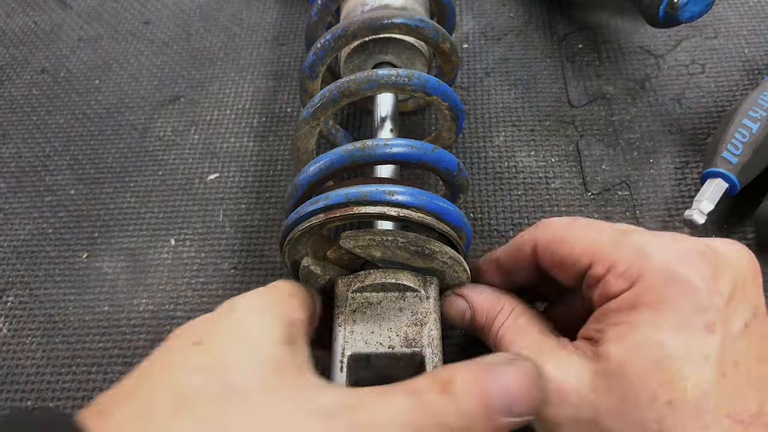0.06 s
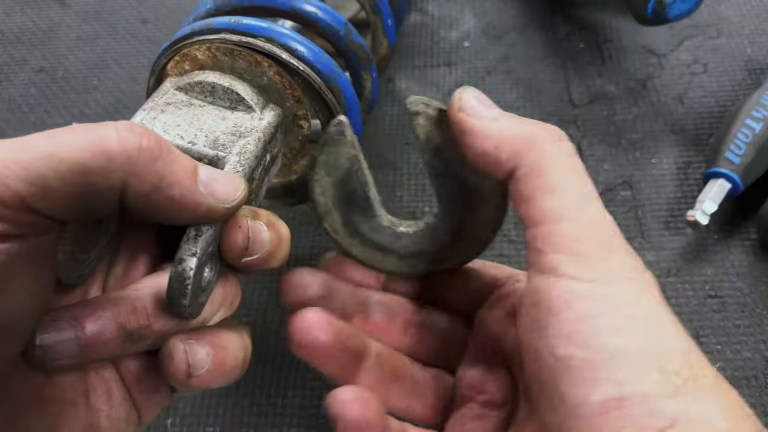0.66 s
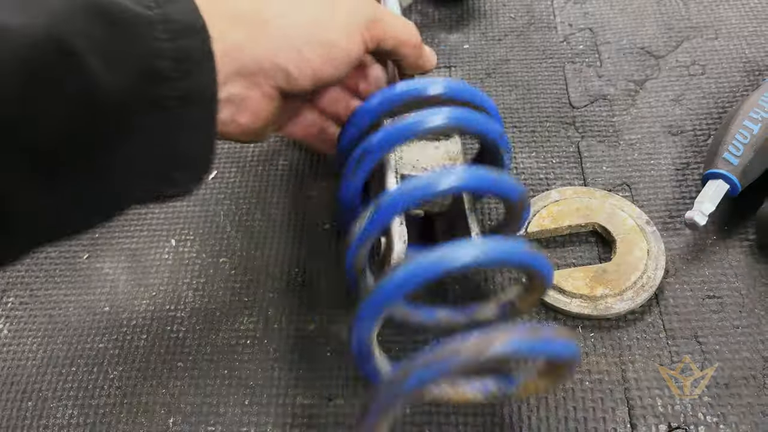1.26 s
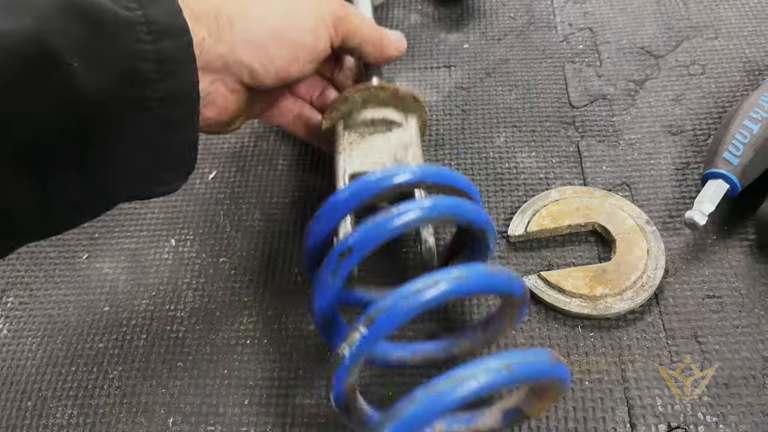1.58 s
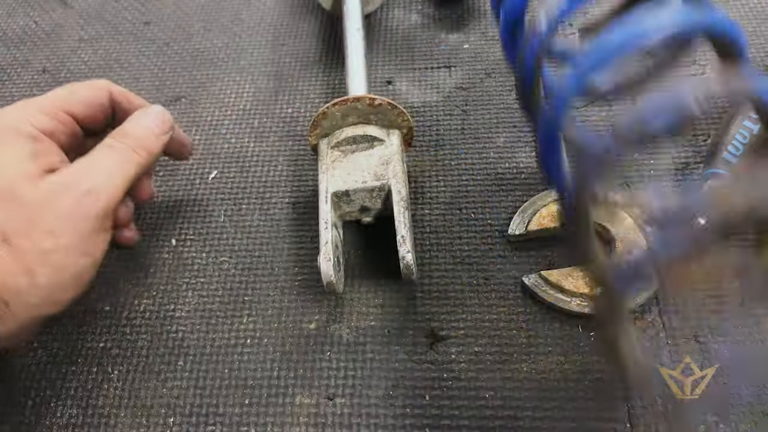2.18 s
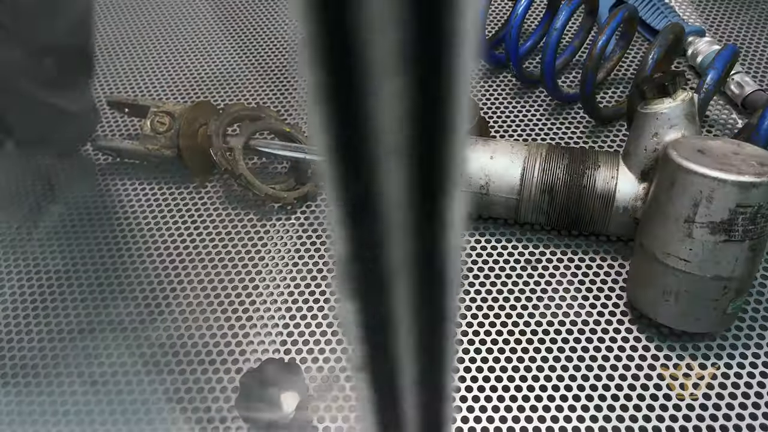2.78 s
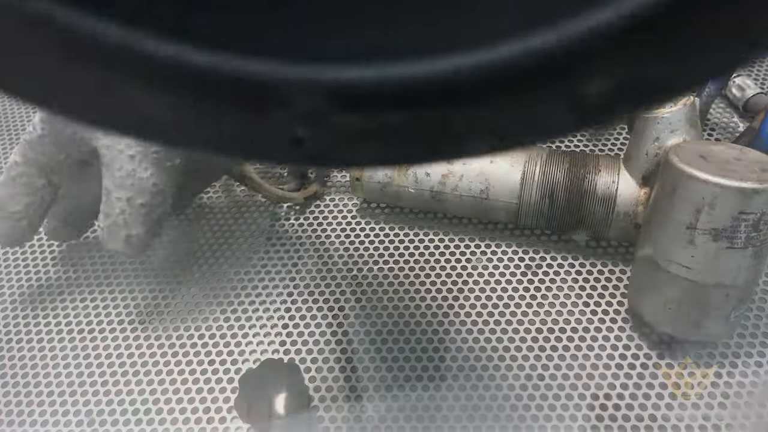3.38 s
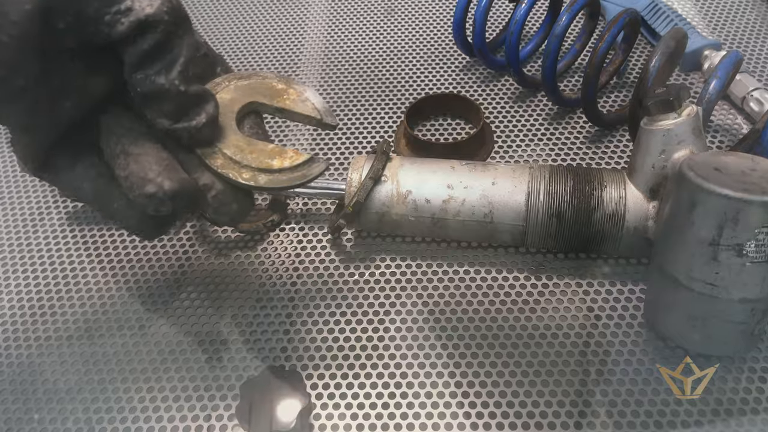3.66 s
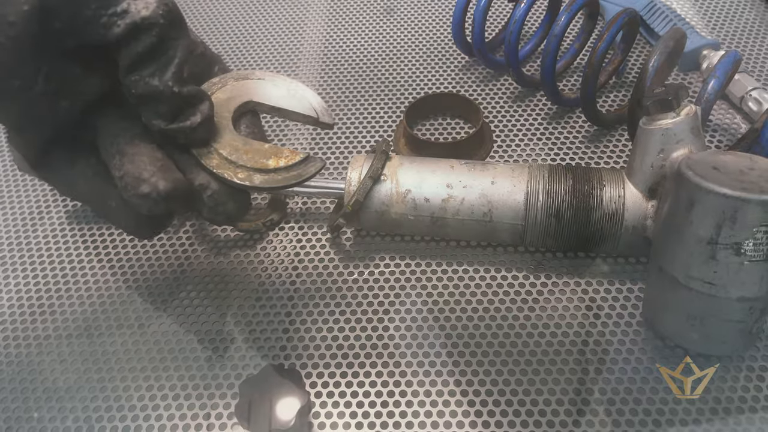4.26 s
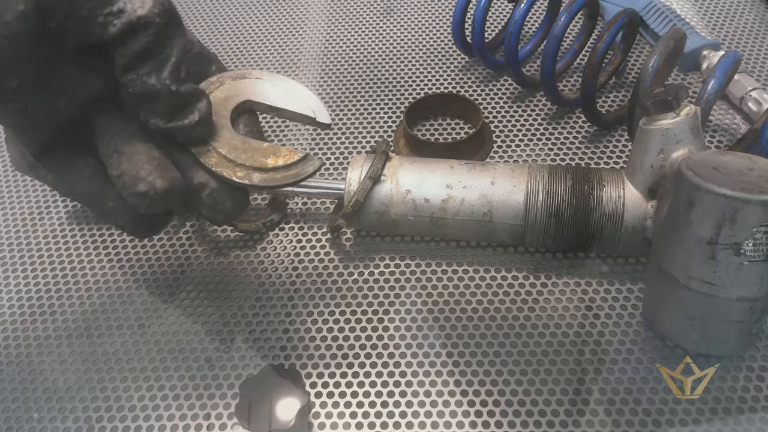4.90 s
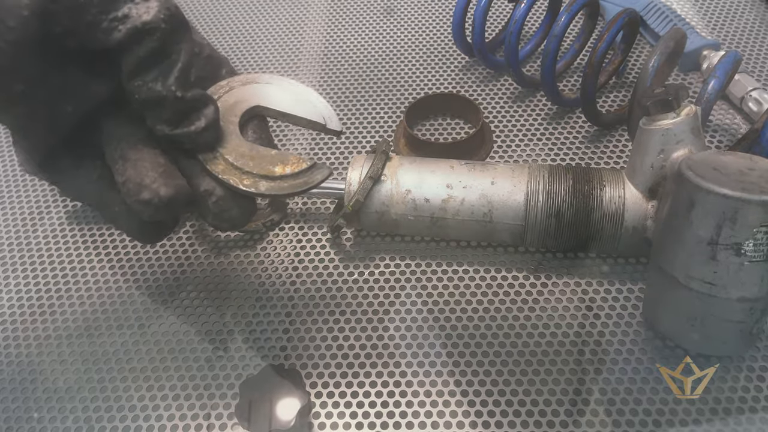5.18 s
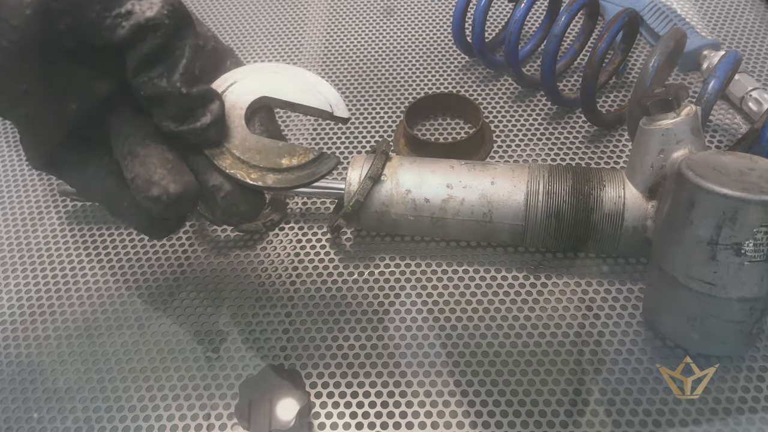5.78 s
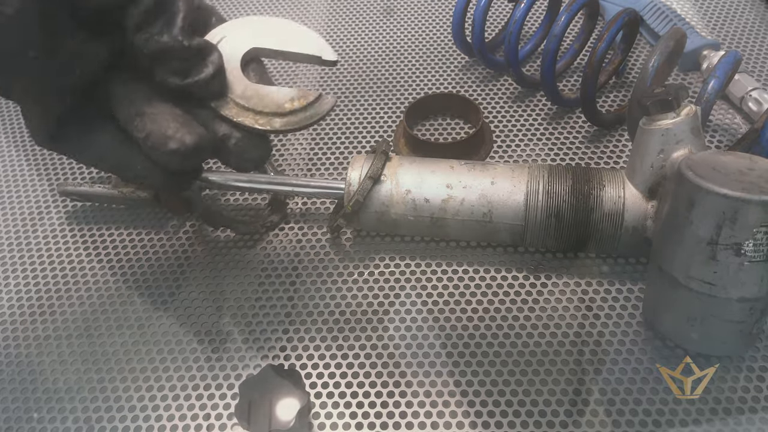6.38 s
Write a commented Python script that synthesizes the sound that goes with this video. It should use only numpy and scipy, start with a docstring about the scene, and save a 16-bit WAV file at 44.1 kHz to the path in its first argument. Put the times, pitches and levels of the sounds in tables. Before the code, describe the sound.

Heard up close in a quiet workshop, small metal clicks and soft hand rubs give way to the scraping and sharp clanking of a steel spring being pulled off a shock absorber. After a brief lull, a blast gun suddenly rushes with air and sputters. Then grit flows in a loud, steady, slightly boxy hiss against a steel collar inside the cabinet, lasting to the end.

```python
"""A jet of grit hisses on a hand-held steel collar in a blast cabinet. Turbulent air roars alone at first,
clumps of grit spit, then countless impacts merge into a bright hiss, coloured by the box's standing waves.
Before this, at the bench, the slotted collar is worked off a shock absorber and the coil spring slides
off, clanking on the fork: friction makes the scraping, and impacts excite the modes of the steel.
The change from bench to cabinet is abrupt. One close microphone with a limiter picks up both."""
import sys
import numpy as np
from scipy import signal
from scipy.fft import rfft, irfft, next_fast_len
from scipy.io import wavfile

SR = 44100
rng = np.random.default_rng(int(sys.argv[2]) if len(sys.argv) > 2 else 0)


def master(y):
    """Save y as 16-bit WAV."""
    cut = np.clip(np.atleast_2d(y).T, -1, 1)
    pcm = np.round(cut * 32767)  # scale
    wavfile.write(sys.argv[1], SR, pcm.astype(np.int16))


N = 292907
TIME, HZ = np.arange(N) / SR, np.fft.rfftfreq(N, 1 / SR)

# Noise spectra. Each row: frequency in Hz, relative spectral density in dB.
ROOM_SPECTRUM = [(20, -23.5), (35, -14), (52, -0.5), (85, -9), (130, -8), (250, -11), (400, -17.5),
                 (700, -24), (1200, -26), (3000, -41.5), (9000, -41.5), (16000, -51)]
SCRAPE_SPECTRUM = [(240, -52), (400, -12.5), (1130, -9.5), (1630, 0), (2750, -14), (3120, -8.5),
                   (5430, -7.5), (6850, -11.5), (8630, -6), (11000, -15.5), (16000, -17.5)]
CRACK_SPECTRUM = [(88, -54), (150, -29), (566, -27), (1360, -7.5), (2360, -10.5), (3420, -3), (4080, -4),
                  (4410, -7.5), (5570, -9.5), (7180, -16), (8230, -10), (9630, -11.5), (16000, -39)]
ROAR_SPECTRUM = [(300, -25), (600, -3.5), (850, -4), (1150, 0), (1550, 1.5), (2100, -1), (2700, -4.5),
                 (3300, -9.5), (4500, -13), (6000, -16), (12000, -36)]
BUFFET_SPECTRUM = [(20, -29), (45, -15), (70, -1.5), (130, -7), (290, 1), (500, -4), (800, -14),
                   (1500, -22.5)]
NOZZLE_SPECTRUM = [(1500, -12), (3200, 4), (4800, 6), (6000, -1), (7500, 2), (10300, 3), (11200, -1),
                   (13000, 0), (13300, 3.5), (16000, 1)]
GRIT_SPECTRUM = [(24, -56), (40, -27), (115, -20.5), (147, -22), (372, -10.5), (503, -12.5), (542, -11.5),
                 (646, -14), (1090, -9), (1340, -8), (3220, -3), (5720, -3), (10200, -4), (11300, -11),
                 (16000, -17.5)]
GLOVE_SPECTRUM = [(20, -4), (45, -4), (110, 4), (160, -22), (1000, -70)]
SKIN_SPECTRUM = [(200, -12), (1600, -1), (3000, -7.5), (5000, -7), (10000, -8.0), (16000, -18)]
SPIT_SPECTRUM = [(400, -16), (1500, 5), (4000, 3), (8000, -1), (16000, -7)]
# Sliding movements. Each row: start in seconds, end in seconds, level in dB.
FINGER_RUBS = [(-0.06, 0.085, -46.5), (0.08, 0.17, -54), (0.14, 0.25, -51.5), (1.74, 2.08, -58),
               (2.03, 2.17, -55), (2.14, 2.5, -54.5)]
STEEL_SCRAPES = [(0.915, 1.05, -40.5), (1.04, 1.13, -31), (1.10, 1.21, -44), (1.18, 1.30, -32),
                 (1.275, 1.405, -27.5), (1.39, 1.72, -45), (1.722, 1.82, -36)]
COLLAR_DRAGS = [(0.24, 0.35, -50), (0.32, 0.425, -46)]
GLOVE_SHIFTS = [(3.45, 4.15, -50), (4.35, 5.1, -47.5)]
# Dry taps of the hands. Each row: start in seconds, level in dB, treble tilt in dB per octave.
HAND_TAPS = [(0.0812, -41, -1), (0.483, -33, -8), (2.058, -48, -5), (2.128, -47, 0), (2.1313, -41, 0)]
# The strut bumps on a rubber mat. Each row: start in seconds, level in dB, frequency in Hz.
MAT_BUMPS = [(0.0, -42, 110), (0.66, -44, 124), (0.941, -38.5, 70), (1.195, -29.5, 66.6), (1.58, -44, 130)]
# Modes of the collar, and of spring and fork. Each row: frequency in Hz, level in dB, t60 in seconds.
COLLAR_MODES = [(1877, 3.5, 0.054), (2490, -5, .14), (3800, -9, 0.023), (4300, 1, .08), (5360, -4, 0.086),
                (6700, -10.5, 0.25), (7550, -14, .06), (9700, -3, .06), (10000, -7.5, 0.037),
                (10870, -12, .06), (11820, -7, 0.14), (13620, -7, .06)]
SPRING_MODES = [(1306, -11, 0.24), (1650, -6, .2), (1965, -13, 0.32), (2120, -3, 0.13), (2630, -19.5, 1.3),
                (2670, -6.5, 0.29), (3040, -16, 0.81), (3120, 0, 0.15), (3300, -6.5, .18),
                (3490, -1.5, 0.19), (3570, -17, 0.43), (3800, -13, 0.13), (3940, -19, .3),
                (4030, 0.5, 0.14), (4100, -12.5, 0.41), (4350, -14, 0.42), (4700, -6, 0.18),
                (5030, -3.5, 0.11), (5310, -3.5, 0.22), (5770, 0.5, .16), (6056, -17, 0.19),
                (6500, -15, .13), (6900, -11, 0.17), (7700, -6, 0.16), (8500, -20, 0.15), (9318, -5, 0.11),
                (9850, -12, 0.1), (10200, -7, 0.11), (11850, -21.5, .1)]
# The collar ticks on its seat. Each row: start in seconds, level in dB, factor on t60,
# frequency in Hz that the contact point favours.
COLLAR_TICKS = [(0.2635, -40, .3, 4300), (0.355, -42, .4, 4300), (0.412, -38, 1.7, 11800),
                (0.420, -37, 0.46, 3800), (0.425, -33, 0.65, 4300), (0.434, -34.5, 0.41, 5300),
                (0.473, -46, .5, 11800), (0.489, -39, 0.7, 5300), (0.9176, -32, 1, 11800)]
# The spring knocks on the fork. Each row: start in seconds, level in dB, treble tilt in dB per octave,
# relative level of the ring in dB, frequency in Hz that the contact point favours, factor on t60.
SPRING_CLANKS = [(0.9172, -29, -8, 0, 11700, 0.94), (0.9418, -9, 3.5, -6.5, 4340, 0.49),
                 (1.1548, -22, -0.5, -10.5, 5000, 0.59), (1.1938, -29, -7, 1.5, 1510, 0.27),
                 (1.2266, -11.5, -1.5, 0, 3740, 0.77), (1.2533, -14.5, -0.5, 2.5, 3730, 0.79),
                 (1.3334, -21, -2, -5, 3200, 0.63), (1.3586, -22.5, 1, 6, 3170, 0.64),
                 (1.386, -11, 2.5, 1, 9700, 0.34), (1.389, -16.5, 0, -5, 3300, 0.98),
                 (1.5797, -10.5, -2.5, -6, 3630, 0.8), (1.6105, -14.5, 0, -3.5, 5700, 0.47),
                 (1.656, -30.5, -2, -14, 1300, .5)]
# Peaks and dips of the steel box. Each row: frequency in Hz, width in Hz, gain in dB for air, for grit.
CABINET_BANDS = [(132, 27, 0.5, 4), (182, 18, 4.5, 3), (215, 23, -7, 1.5), (266, 14, 0, 5),
                 (295, 19, -2, -7.5), (328, 31, 1.5, 3.5), (355, 16, -0.5, -7), (386, 20, -3.5, 5),
                 (405, 17, 0, -8), (505, 22, 1.5, -4), (537.3, 16, 5, 7), (571, 13, 4.5, -9),
                 (602, 10, 1, 7.5), (650, 30, 2.5, 1), (714, 12, 4, 8), (754, 18, 5, 3), (799, 16, 2, 8),
                 (823, 19, -7, -11), (856, 15, 6.5, 3.5), (1025, 17, -1, 5), (1117, 53, 3.5, 3.5),
                 (1185, 20, -7, -2.5), (1327, 71, -2.5, -7.5), (1346, 33, 3, 2.5), (1530, 19, 2, 2),
                 (2270, 550, -1, -1.5), (2950, 830, 0.5, 2.5), (5950, 1060, -1, -3.5), (10800, 410, 3, 1),
                 (11270, 1500, -1.5, -3)]
# The air surges. Each row: start in seconds, end in seconds, relative swell, sizzle level in dB.
AIR_SURGES = [(2.47, 2.6, 1, -38), (2.58, 2.68, 4, -24), (2.73, 2.91, 2.2, -36)]
# The first clumps of grit leave the nozzle. Each row: start in seconds, level in dB.
GRIT_SPITS = [(2.600, -15), (3.088, -18), (3.1163, -12.5), (3.1463, -12.5), (3.171, -10), (3.3239, -17),
              (3.5576, -9)]
# The uneven feed of grit, heard as the level of the treble. Each row: time in seconds, level in dB.
GRIT_FEED = [(3.58, -15), (3.68, -16.5), (3.87, -23.5), (4.53, -17.5), (4.85, -17.5), (4.99, -23),
             (5.89, -19.5), (6.1, -20), (6.34, -17.5), (6.55, -18), (6.62, -17)]
# The jet hits the collar squarely. Each row: start in seconds, end in seconds, midrange gain in dB.
JET_SWEEPS = [(3.72, 3.84, 1.5), (4.617, 4.88, 2), (5.097, 6.352, 2), (5.836, 5.95, 2), (6.24, 6.492, 4.6)]

SPRING_FREE_S, AIR_ON_S, GRIT_ON_S = 1.72, 2.435, 3.555


def gain_of(db):
    """Amplitude grows tenfold for every 20 dB."""
    return 10 ** (np.asarray(db) / 20)


def unit_rms(x):
    """Division by the rms gives a signal unit power."""
    return x / np.sqrt(np.mean(x ** 2) + 1e-20)


def spectrum_db(points, hz=HZ):
    """Interpolation on a log-frequency axis joins points into a spectrum."""
    f, db = np.transpose(points)
    return np.interp(np.log(hz + 1), np.log(f + 1), db)


def add(mix, s, sound):
    """Superposition: a sound joins the mix at s seconds."""
    start = round(s * SR)
    sound = sound[max(-start, 0):]
    part = mix[max(start, 0):][:len(sound)]
    part += sound[:len(part)]


def coloured(x, db):
    """Linear filtering multiplies each frequency by its own gain."""
    size = next_fast_len(N)
    response = gain_of(np.interp(np.fft.rfftfreq(size, 1 / SR), HZ, db))
    return irfft(rfft(x, size) * response, size)[:N]


def below(x, edge_hz, order):
    """A zero-phase low-pass filter keeps what lies under the edge."""
    return coloured(x, -20 * np.log10(1 + (HZ / edge_hz) ** order))


def noise(db):
    """Filtered white noise takes on the filter's spectrum; its rms is 1."""
    return unit_rms(coloured(rng.standard_normal(N), db))


def flutter(rate_hz):
    """Slow noise of rms 1, from about 8 Hz to rate_hz, serves as a random modulator."""
    return noise(-10 * np.log10(1 + (HZ / rate_hz) ** 4) - 10 * np.log10(1 + (8 / (HZ + .01)) ** 4))


def ramp(start_s, rise_s):
    """A linear envelope rises from 0 to 1 and holds."""
    return np.clip((TIME - start_s) / rise_s, 0, 1)


def arch(start, end):
    """A half-sine envelope rises from 0 to 1 and falls back."""
    return np.sin(np.pi * np.clip((TIME - start) / (end - start), 0, 1))


def strokes(rows):
    """Overlapping swells sum to one amplitude envelope."""
    return sum(gain_of(db) * arch(start, end) for start, end, db in rows)


def crack(tilt_db, t60, tail_db, tail_t60):
    """Dense, heavily damped modes merge into a noise burst; bench and walls reflect a weak tail."""
    t, hz = np.arange(16384) / SR, np.fft.rfftfreq(16384, 1 / SR)
    colour_db = spectrum_db(CRACK_SPECTRUM, hz) + tilt_db * np.log2(np.maximum(hz, 700) / 4000)
    burst = unit_rms(irfft(rfft(rng.standard_normal(len(t))) * gain_of(colour_db)))
    return burst * np.hypot(gain_of(-60 * t / t60), gain_of(tail_db - 60 * t / tail_t60))


def ring(modes, favoured_hz, t60_factor, favour_db, scatter_db):
    """Free vibration: the contact point decides which modes take the blow, and the grip damps them."""
    hz, db, t60 = np.transpose(modes)[:, :, None]
    t = np.arange(SR * 2 // 3) / SR
    nearness = np.exp(-(np.log2(hz / favoured_hz) / 0.34) ** 2)
    amplitude = gain_of(db + favour_db * nearness + scatter_db * rng.standard_normal(hz.shape))
    waves = np.sin(2 * np.pi * (hz * t + rng.random(hz.shape)))
    decay = gain_of(-60 * t / (t60 * t60_factor))
    return (amplitude * waves * decay).sum(0) / np.sqrt(np.sum(amplitude ** 2) / 2)


def workshop():
    """Ambient noise: a low rumble and a faint hiss waver slightly in level."""
    return noise(spectrum_db(ROOM_SPECTRUM)) * gain_of(-47 + flutter(8))


def gloves():
    """Friction of the rubber gloves in their ports makes a faint rumble."""
    return noise(spectrum_db(GLOVE_SPECTRUM)) * strokes(GLOVE_SHIFTS)


def handling():
    """Friction of coil and fingers gives grainy noise; light impacts give taps and damped thuds."""
    catches = rng.random(N) < 350 / SR  # rust and dirt snag the coil
    force = catches * gain_of(4 * np.minimum(rng.exponential(1, N), 3.5))
    grains = signal.oaconvolve(force, crack(1.5, t60=.006, tail_db=-29, tail_t60=.04))[:N]
    sliding = noise(spectrum_db(SCRAPE_SPECTRUM)) * gain_of(2 * flutter(260))
    scrape = unit_rms(sliding + gain_of(-8) * unit_rms(grains))
    skin = noise(spectrum_db(SKIN_SPECTRUM)) * gain_of(2.2 * flutter(180))
    out = scrape * strokes(STEEL_SCRAPES) + skin * strokes(FINGER_RUBS)
    for s, db, tilt_db in HAND_TAPS:
        add(out, s, gain_of(db) * crack(tilt_db, t60=.016, tail_db=-15, tail_t60=0.15))
    t = np.arange(SR // 2) / SR
    bump_envelope = t / 0.035 * np.exp(1 - t / 0.029)
    for s, db, hz in MAT_BUMPS:
        add(out, s, gain_of(db) * bump_envelope * np.sin(2 * np.pi * hz * t))
    return out


def collar():
    """Stick-slip friction in the slot makes the collar catch and sing; small impacts make it tick."""
    snags_per_s, snag_db = 45, 5
    click = dict(tilt_db=1, t60=0.013, tail_db=-26, tail_t60=.08)
    out, drag = np.zeros(N), strokes(COLLAR_DRAGS)
    for s, db, t60_factor, hz in COLLAR_TICKS:
        add(out, s, gain_of(db) * ring(COLLAR_MODES, hz, t60_factor, favour_db=3, scatter_db=2.0))
        add(out, s, gain_of(db - 5) * crack(**click))
    snags = drag * (rng.random(N) < snags_per_s / SR)
    out += gain_of(snag_db) * signal.oaconvolve(snags, crack(**click))[:N]
    mode_power = sum(gain_of(db) ** 2 / (1 + ((HZ - hz) / 70) ** 2) for hz, db, _ in COLLAR_MODES)
    squeak_db = 7 * np.exp(-((HZ - 10000) / 700) ** 2)  # sliding feeds the high modes most
    singing = noise(10 * np.log10(mode_power) + squeak_db) * gain_of(2.1 * flutter(200))
    return out + singing * drag


def spring():
    """Impact excitation: each knock cracks and rings, and the coil rebounds once, softer and duller."""
    rebound_s = 0.0245
    out = np.zeros(N)
    for s, db, tilt_db, ring_db, hz, t60_factor in SPRING_CLANKS:
        blow = crack(tilt_db, t60=0.042, tail_db=-22, tail_t60=0.31)
        ringing = ring(SPRING_MODES, hz, t60_factor, favour_db=12, scatter_db=1.8)
        rebound = crack(tilt_db - 4.5, t60=0.033, tail_db=-18, tail_t60=0.28)
        add(out, s, gain_of(db + 2) * blow)
        add(out, s, gain_of(db + ring_db) * ringing)
        add(out, s + rebound_s, gain_of(db - 14) * rebound)
    return out * gain_of(-30 * ramp(SPRING_FREE_S, 0.23))  # the hand mutes the freed spring


def cabinet():
    """Standing waves, distinct in the bass and dense above, set the box's gain in dB for air and grit."""
    air_db, grit_db = np.zeros((2, len(HZ)))
    for hz, width, air_peak_db, grit_peak_db in CABINET_BANDS:
        band = 1 / (1 + (2 * (HZ - hz) / width) ** 4)
        air_db += air_peak_db * band
        grit_db += grit_peak_db * band
    grid_hz = np.arange(0, SR / 2, 18)
    ripple = np.interp(HZ, grid_hz, rng.standard_normal(len(grid_hz)))
    dense_db = 1.5 * ripple * np.clip(HZ / 1500, 0, 1) ** 2
    return air_db + dense_db, grit_db + dense_db


def air(box_db):
    """Turbulence radiates broadband noise: the bare jet roars, buffets the walls and hisses at the nozzle."""
    roar_db, buffet_db, nozzle_db = -14.5, -23.5, -22.5
    gust = flutter(47)
    surge = sum(swell * arch(start, end) for start, end, swell, _ in AIR_SURGES)
    build = 1 - np.exp(-np.maximum(TIME - AIR_ON_S, 0) / 0.0093)  # the valve opens
    fall_db = -9.5 * ramp(2.965, 0.28)  # the roar dies back
    lead_db = 4 * ramp(GRIT_ON_S - 0.088, 0.03)  # the hiss rises just before the grit arrives
    roar = noise(spectrum_db(ROAR_SPECTRUM) + box_db) * build
    roar *= gain_of(roar_db + fall_db + 0.68 * surge + 0.67 * gust)
    buffet = noise(spectrum_db(BUFFET_SPECTRUM) + box_db) * gain_of(buffet_db)
    hiss = noise(spectrum_db(NOZZLE_SPECTRUM) + box_db)
    hiss *= gain_of(nozzle_db + 1.14 * surge + lead_db + gust)
    sizzle = noise(-20 * np.log10(1 + ((HZ - 14300) / 1300) ** 4))
    sizzle *= strokes((start, end, db) for start, end, _, db in AIR_SURGES)
    return (roar + buffet + hiss + sizzle) * ramp(AIR_ON_S, 0.0033) * (1 - ramp(GRIT_ON_S, 0.015))


def spits(box_db):
    """Clumps of grit act as short pulses, each giving a bright puff of noise."""
    peak_s = 0.0011
    age = np.arange(SR // 20) / SR / peak_s
    force = np.zeros(N)
    for s, db in GRIT_SPITS:
        add(force, s, gain_of(db) * age * np.exp(1 - age))
    return force * noise(spectrum_db(SPIT_SPECTRUM) + box_db)


def grit(box_db):
    """Countless impacts add incoherently to a hiss; more grit brightens it, a square hit lifts its middle."""
    level_db, usual_feed_db = -16, -20
    shielding = 0.65  # dB of drone lost per dB of midrange gained, as the collar shields the walls
    feed_db = np.interp(TIME, *np.transpose(GRIT_FEED)) - usual_feed_db
    aim_db = sum(db * arch(start, end) for start, end, db in JET_SWEEPS)
    jet = noise(spectrum_db(GRIT_SPECTRUM) + box_db)
    low, mid, high = below(jet, 1360, order=4), below(jet, 6600, order=6), below(jet, 9900, order=12)
    drone = low * gain_of(0.59 * feed_db - shielding * aim_db)
    body = (mid - low) * gain_of(0.45 * feed_db + aim_db)
    fizz = (high - mid) * gain_of(feed_db)
    top = (jet - high) * gain_of(1.55 * feed_db)
    return (drone + body + fizz + top) * gain_of(level_db + 0.23 * flutter(25)) * ramp(GRIT_ON_S, 0.0041)


def scene():
    """The sources superpose, bench work first and then the cabinet, alike in both channels."""
    bench = (collar() + spring() + handling() + workshop()) * (1 - ramp(AIR_ON_S, .004))
    air_box_db, grit_box_db = cabinet()
    blasting = air(air_box_db) + spits(air_box_db) + grit(grit_box_db) + gloves()
    return np.tile(bench + blasting, (2, 1))


def record(dry):
    """Soft saturation rounds off peaks near full scale; a low-pass filter then limits the bandwidth."""
    ceiling, edge_hz = .95, 15850
    limited = dry / (1 + (dry / ceiling) ** 8) ** (1 / 8)
    lowpass = signal.firwin(511, edge_hz, window=("kaiser", 9), fs=SR)
    return signal.oaconvolve(limited, lowpass[None], "same")


dry = scene()
out = record(dry)
master(out)
```